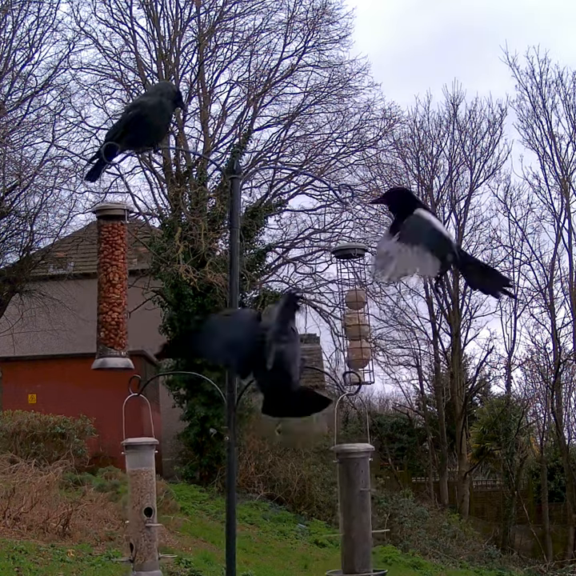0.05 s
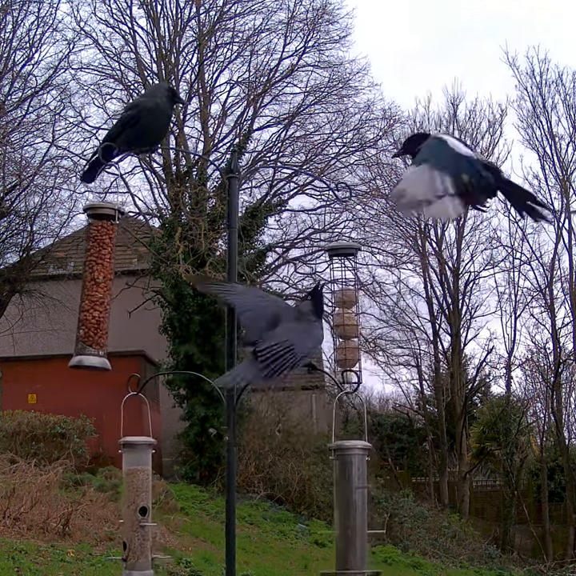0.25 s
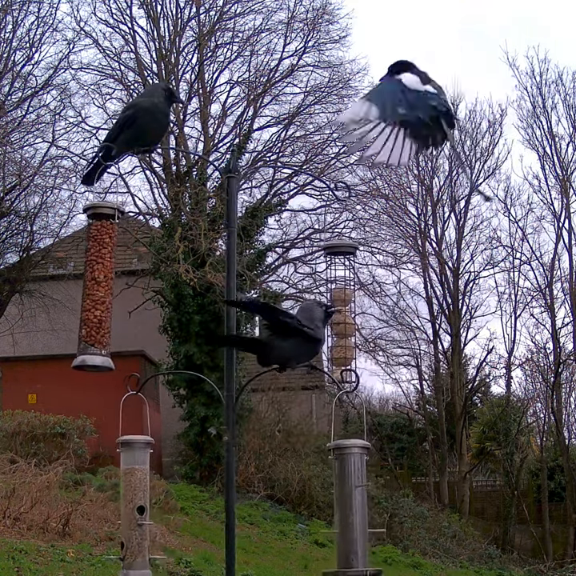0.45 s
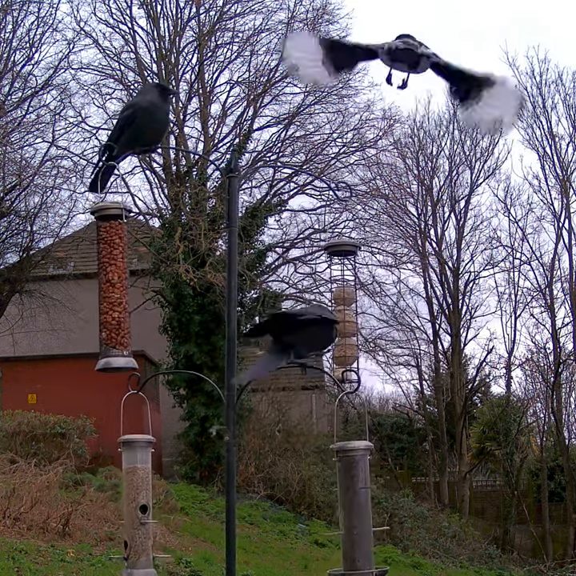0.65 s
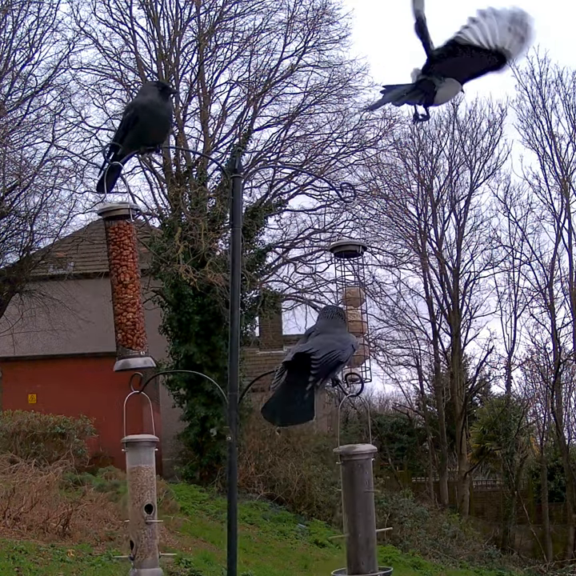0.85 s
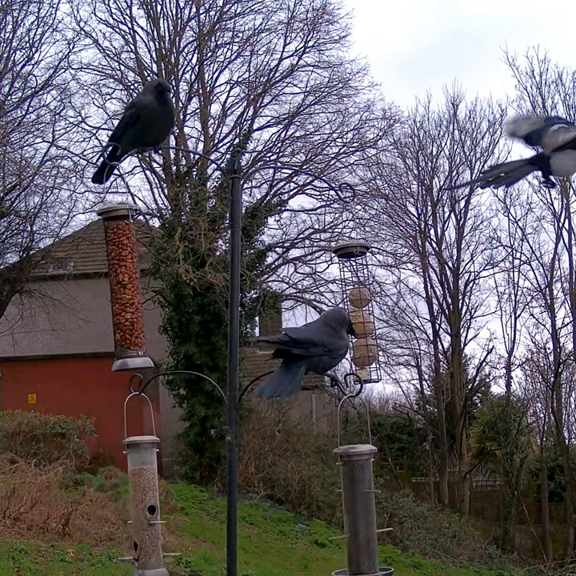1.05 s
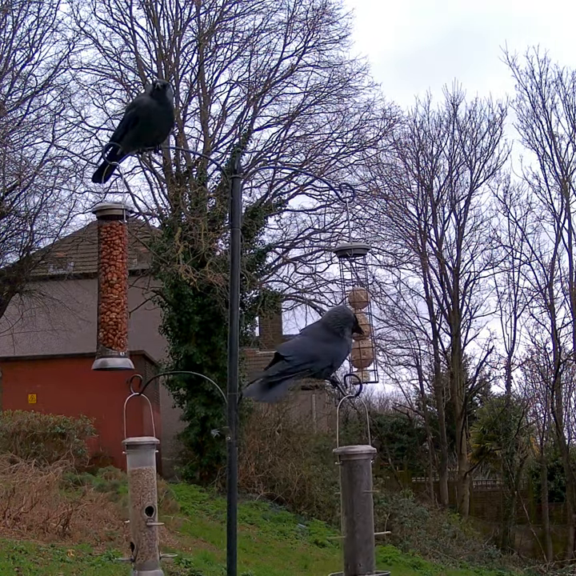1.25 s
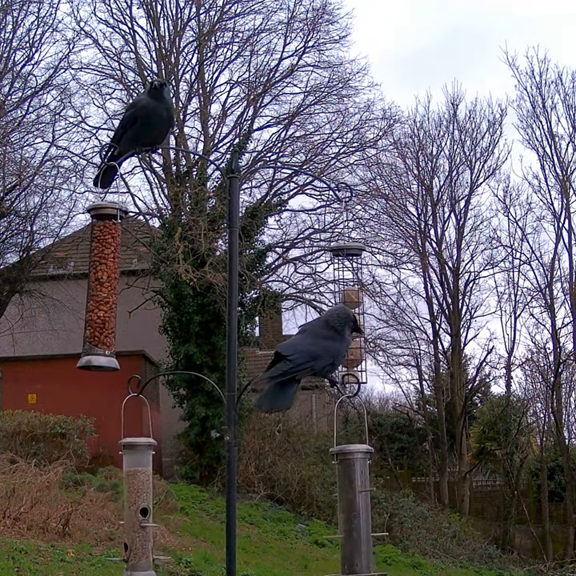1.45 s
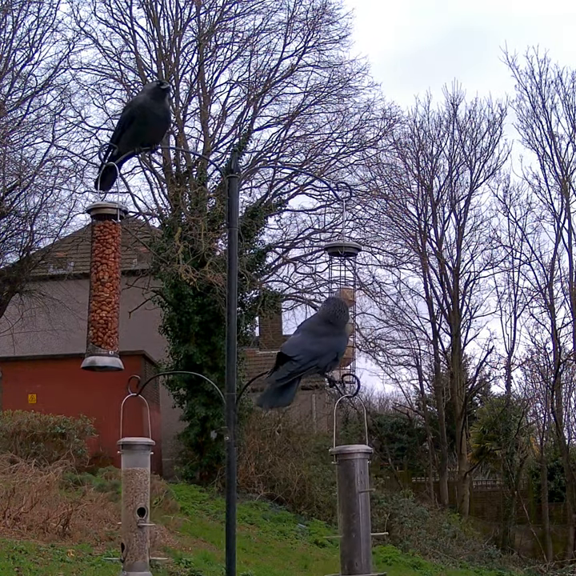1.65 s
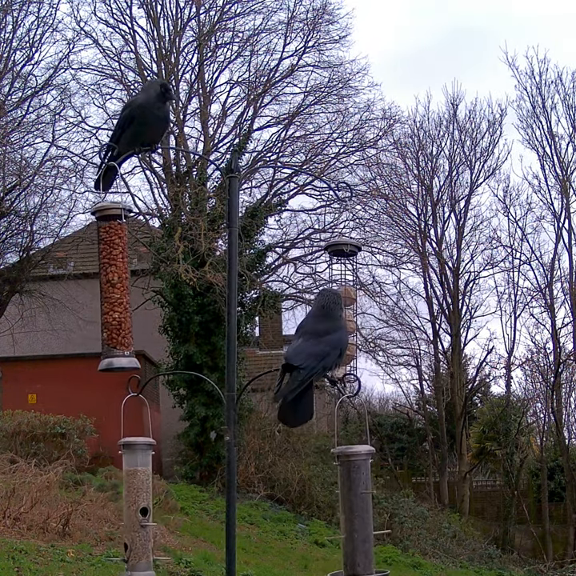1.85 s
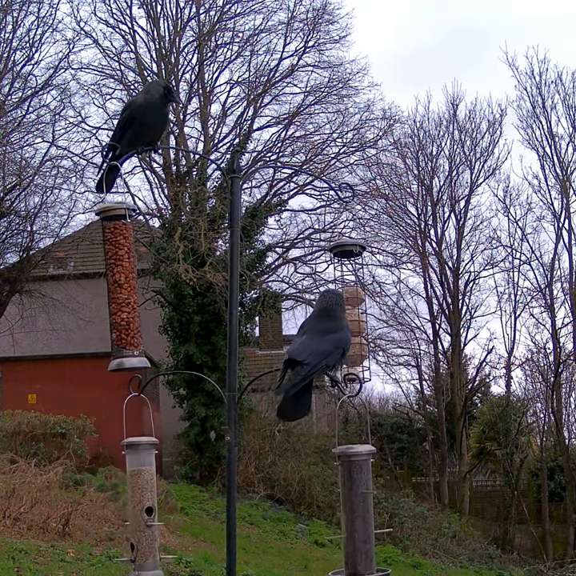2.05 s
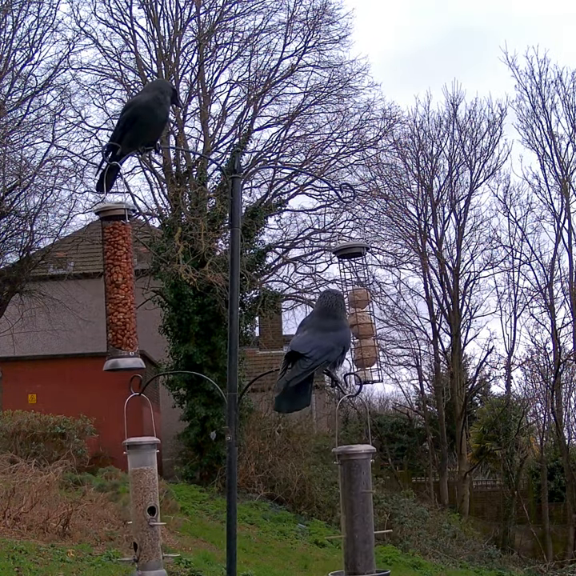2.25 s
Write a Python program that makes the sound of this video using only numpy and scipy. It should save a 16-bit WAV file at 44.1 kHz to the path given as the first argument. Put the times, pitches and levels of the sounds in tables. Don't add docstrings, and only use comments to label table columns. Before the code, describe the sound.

Two clipped, falling jackdaw calls half a second apart, the first fuller, echo briefly off garden walls; then soft wing flutters and small ticks fade over faint wind and traffic, heard through a small, slightly dull microphone.

```python
import sys
import numpy as np
from scipy import signal
from scipy.fft import rfft, irfft, next_fast_len
from scipy.io import wavfile
from scipy.ndimage import uniform_filter1d, map_coordinates

SR = 44100
rng = np.random.default_rng(int(sys.argv[2]) if len(sys.argv) > 2 else 0)


def gain_from_db(level_db):
    decades = np.asarray(level_db, float) / 20
    return 10 ** decades


def master_out(mix):
    frames = np.transpose(np.atleast_2d(mix))
    ceiling = np.clip(frames, -1, 1)
    pcm = np.round(ceiling * 32767).astype(np.int16)
    wavfile.write(sys.argv[1], SR, pcm)


N = 101429
T = np.arange(N) / SR


def unit(x):
    return x / np.sqrt(np.mean(x ** 2) + 1e-20)


def along(points, hz):
    f, value = np.transpose(points)
    return np.interp(np.log(hz + 1), np.log(f + 1), value)


def wobble(rate):
    knots = rng.standard_normal(int(N * rate / SR) + 4)
    return map_coordinates(knots, [T * rate])


def filtered(x, response):
    size = next_fast_len(N + SR // 2)
    return irfft(rfft(x, size) * response(np.fft.rfftfreq(size, 1 / SR)), size)[:N]


def peak(f, centre, width):
    return 1j * f * width / (centre * centre - f * f + 1j * f * width)


def sine(hz):
    return np.sin(2 * np.pi * np.cumsum(hz) / SR)


def rush(spectrum, patchy_db):
    cells = signal.stft(rng.standard_normal(N + 512), nperseg=512)[2]
    patches = uniform_filter1d(rng.standard_normal(cells.shape), size=6, axis=0)
    patches = unit(uniform_filter1d(patches, size=10, axis=1))
    noise = signal.istft(cells * gain_from_db(patchy_db * patches), nperseg=512)[1][:N]
    return unit(filtered(noise, lambda hz: gain_from_db(along(spectrum, hz))))


# pitch_hz, t60_s
GARDEN_DECAY = [(500, .24), (2000, 0.15), (8000, 0.13)]


def garden(x):
    hz, t, cells = signal.stft(rng.standard_normal(SR // 2), SR, nperseg=256)
    fade = gain_from_db(-60 * t / along(GARDEN_DECAY, hz)[:, None])
    tail = signal.istft(cells * fade, SR, nperseg=256)[1]
    return signal.fftconvolve(np.pad(x, (600, 0)), tail / np.linalg.norm(tail))[:N]


# time_s, level_db
WIND_GUSTS = [(0.0, -62), (0.1, -53.5), (0.14, -62.5), (0.3, -50), (0.33, -56.5), (0.73, -56.5),
              (0.77, -43), (0.81, -57), (1.14, -50.5), (1.29, -55), (1.32, -49.5), (1.44, -57.5),
              (2.04, -56.5), (2.05, -61.5), (2.14, -54.5), (2.3, -57.5)]
# pitch_hz, density_db
WIND_SPECTRUM = [(12, -31), (20, 5.5), (38, -4), (64, 0), (107, -9.5), (150, -28), (200, -17.5), (260, -34),
                 (440, -120)]


def wind():
    gust_db = np.interp(T, *np.transpose(WIND_GUSTS))
    rumble = gain_from_db(0.46 * wobble(30.2)) * rush(WIND_SPECTRUM, patchy_db=0.33)
    return gain_from_db(gust_db) * unit(rumble)


# time_s, level_db
AIR_STRENGTH = [(0.0, -65), (0.19, -62.5), (0.37, -58), (0.5, -64.5), (0.75, -59), (0.93, -57.5),
                (1.4, -61), (1.98, -65), (2.3, -64)]


def air_strength():
    return np.interp(T, *np.transpose(AIR_STRENGTH))


# pitch_hz, density_db
TRAFFIC_SPECTRUM = [(71, -30), (120, -11.5), (217, -5), (317, -8), (360, -5.5), (380, -14), (500, -9),
                    (962, -8.5), (1500, -33), (1950, -31), (3300, -120)]
TRAFFIC_DB = 1


def traffic(air_db):
    return gain_from_db(air_db + TRAFFIC_DB + 2.2 * wobble(7.925)) * rush(TRAFFIC_SPECTRUM, patchy_db=2.0)


# pitch_hz, density_db
HISS_SPECTRUM = [(760, -43), (1300, -9.5), (1740, -6), (1950, -9.5), (3240, -11.5), (3860, -10.5),
                 (5310, -11.5), (5900, -6), (8000, -13), (10400, -31), (17600, -120)]
HISS_DB, HISS_GROWS = -11, 1.13


def tree_hiss(air_db):
    mean_db = air_db.mean()
    level_db = mean_db + HISS_GROWS * (air_db - mean_db) + HISS_DB + 1.37 * wobble(13.06)
    return gain_from_db(level_db) * rush(HISS_SPECTRUM, patchy_db=-2.0)


def background():
    air_db = air_strength()
    return wind() + traffic(air_db) + tree_hiss(air_db)


# start_s, length_s, from_hz, to_hz, level_db
WHISTLES = [(0, .016, 1650, 1750, -68), (-.006, .011, 2550, 2500, -58), (.004, .018, 2000, 2750, -58),
            (.024, .014, 2100, 2500, -66), (.027, .015, 1700, 1700, -71), (.048, .01, 2200, 2600, -69),
            (.43, .03, 3250, 2750, -73), (.53, .07, 5000, 4920, -78), (1.39, .066, 8000, 7350, -69.5),
            (1.55, .045, 7500, 7150, -76), (1.59, .025, 6350, 5800, -80), (1.875, .03, 6350, 5800, -77)]


def whistle(start, length, from_hz, to_hz, db):
    progress = np.clip((T - start) / length, 0, 1)
    hz = from_hz + (to_hz - from_hz) * progress + 35 * wobble(150)
    swell = np.sqrt(2 * np.abs(np.sin(np.pi * progress))) * (progress < 1)
    return swell * gain_from_db(db + 3 * wobble(120)) * sine(hz)


# start_s, length_s, level_db, low_turn_s, swings_per_s
TRILLS = [
    (-.08, 0.11, -53, -.003, 48),
    (2.223, .1, -51, 2.246, 66),
]
TRILL_LOW_HZ, TRILL_CLIMB_HZ_PER_S, TRILL_TOP_HZ = 2180, 5100, 3780
TRILL_TOP_GAIN_HZ, TRILL_DWELL = 550, 2.1
TRILL_START_DB, TRILL_RISE_S = -12, 0.056
TRILL_TOP_DB, TRILL_TOP_LATE_S, TRILL_TURN_DB = -16, 0.06, 2.5
TRILL_ECHO_S, TRILL_ECHO_DB = 0.009, -11.5


def trill(start, length, db, turn, rate):
    age = np.clip(T - start, 0, length)
    young = np.clip(1 - age / TRILL_TOP_LATE_S, 0, 1)
    up = (np.abs(1 - np.cos(2 * np.pi * rate * (T - turn))) / 2) ** TRILL_DWELL
    low_hz = TRILL_LOW_HZ + TRILL_CLIMB_HZ_PER_S * np.minimum(age, 0.055)
    top_hz = TRILL_TOP_HZ - TRILL_TOP_GAIN_HZ * young
    hz = low_hz + (top_hz - low_hz) * up
    gate = np.clip(age / 0.004, 0, 1) * np.clip((length - age) / 0.006, 0, 1)
    level_db = db + TRILL_START_DB * np.clip(1 - age / TRILL_RISE_S, 0, 1)
    level_db = level_db - TRILL_TURN_DB * 4 * up * (1 - up) + TRILL_TOP_DB * up * np.sqrt(young)
    level_db = level_db + 2.0 * wobble(110)
    tone = np.sqrt(2) * gate * gain_from_db(level_db) * sine(hz)
    echo = filtered(tone, lambda f: np.exp(-2j * np.pi * f * TRILL_ECHO_S))
    tail_fade = gain_from_db(-300 * np.clip(T - start - length, 0, 1))
    return tone + gain_from_db(TRILL_ECHO_DB) * (echo + 0.99 * garden(tone) * tail_fade)


# time_s, peak_db, pitch_hz, length_s
TICKS = [(0.064, -65.5, 3840, 0.027), (0.091, -63.5, 3780, 0.025), (0.143, -57, 6070, 0.011),
         (0.17, -67, 3870, 0.0059), (0.325, -59.5, 6200, .003), (0.382, -61.5, 6050, .012),
         (.504, -46.5, 6100, 0.0068), (.509, -52, 7500, .005), (0.52, -54, 5950, .005),
         (0.57, -51, 3830, 0.0069), (0.58, -56, 3820, .006), (0.57, -54, 5930, 0.0092),
         (.579, -54, 2840, 0.00075), (0.798, -53, 3860, 0.0056), (.811, -54, 6150, 0.0055),
         (0.826, -58, 6000, 0.0043), (0.823, -54, 3760, 0.0069), (0.835, -55, 3800, .007),
         (0.867, -52.5, 3800, .009), (.881, -51.5, 3805, 0.0095), (.905, -52.5, 3900, .008),
         (.916, -53.5, 3800, 0.012), (0.943, -55, 6000, .006), (0.892, -46.5, 5820, 0.0033),
         (0.951, -52, 6740, 0.0054), (0.992, -53, 3920, 0.0034), (1.038, -50, 5950, 0.0078),
         (1.115, -60, 3700, 0.0054), (1.975, -64.5, 3820, 0.0063)]


def ticks():
    waver = np.cumsum(wobble(400)) * 45 / SR
    out = np.zeros(N)
    for s, db, hz, length in TICKS:
        bell = np.exp(-((T - s) / length * 2) ** 2)
        out += gain_from_db(db - 0.5) * bell * np.sin(2 * np.pi * (hz * T + waver))
    return out


# end_s, swell_s, level_db
STROKES = [(0.147, 0.013, -71), (0.387, 0.0068, -76), (.46, 0.022, -86), (0.508, 0.018, -58),
           (0.52, 0.013, -59.5), (.535, .025, -62.5), (.582, 0.06, -64), (.665, 0.047, -73.5),
           (0.817, 0.0099, -52), (0.846, 0.073, -56), (0.897, 0.014, -59), (0.948, 0.089, -56.5),
           (1.013, 0.012, -55.5), (1.047, 0.039, -55.5), (1.113, 0.017, -59), (1.148, 0.04, -57),
           (1.228, 0.046, -68), (1.257, 0.011, -60.5), (1.366, 0.025, -63), (1.48, 0.019, -67.5),
           (1.596, 0.018, -71), (1.72, 0.094, -73), (1.82, 0.011, -69), (1.886, 0.009, -78),
           (2.09, 0.013, -83.5)]
# pitch_hz, density_db
FEATHERS = [(760, -49.5), (1300, -27), (2020, -20), (2520, -6), (3290, -19.5), (3770, -4.5), (5310, -8),
            (5950, 4), (8000, -5.5), (10400, -26.5), (17600, -120)]
# pitch_hz, density_db
PUFF = [(60, -13.5), (250, -0.5), (750, 9), (1100, 0.5), (1500, -38)]
STROKE_STOP_S, RUSTLE_DB, PUFF_DB = 0.007, 1.8, 1


def wings():
    power = np.zeros(N)
    for end, swell, db in STROKES:
        distance = np.where(T < end, (end - T) / swell, (T - end) / STROKE_STOP_S)
        power += gain_from_db(2 * db) * np.exp(-2 * distance)
    rustle = unit(gain_from_db(RUSTLE_DB * wobble(250)) * rush(FEATHERS, patchy_db=1))
    puff = gain_from_db(PUFF_DB) * rush(PUFF + [(3000, -51)], patchy_db=2.5)
    return np.sqrt(power) * (rustle + puff)


# delay_s, level_db
ECHOES = [
    (0.031, -14.5),
    (.055, -24.5),
    (0.137, -34.5),
]
# pitch_hz, gain_db
WALL_COLOUR = [(900, 0.5), (2200, -5.5), (4000, -8.5), (7000, -2)]
WALL_SMEAR_S = 0.005


def wall_echoes(call):
    t, walls = T[:SR // 50], np.zeros(SR // 4)
    for delay, db in ECHOES:
        smear = rng.standard_normal(len(t)) * gain_from_db(-60 * t / WALL_SMEAR_S)
        walls[round(delay * SR):][:len(t)] += gain_from_db(db) * smear / np.linalg.norm(smear)
    echo = signal.fftconvolve(call, walls)[:N]
    return filtered(echo, lambda f: gain_from_db(along(WALL_COLOUR, f)))


# pitch_hz, width_hz, gain_db
THROAT = [(900, 670, 1.5), (2282, 290, 9), (1756, 380, -1.5), (2960, 650, 2.5), (3700, 540, 0),
          (4730, 340, -10.5), (6900, 670, -12)]


def throat(f):
    return sum(gain_from_db(g) * peak(f, centre, width) ** 2 for centre, width, g in THROAT)


# time_s, pitch_hz, effort_db
CALLS = [
    [(.222, 1130, -40), (.226, 1118, -32.5), (.236, 1060, -33), (.251, 922, -33), (.257, 845, -38),
     (.264, 770, -45), (.279, 640, -46)],
    [(.727, 1120, -56), (.733, 1090, -52), (.7355, 1040, -37.5), (.752, 925, -36), (.757, 870, -42),
     (.764, 780, -48), (.774, 700, -51)],
]
JITTER, BREATH_DB, ATTACK_S, RELEASE_S = 0.0041, -17, 0.00157, 0.0013
DULLING, ROUGH_DB = 0.55, 3
BREAKUP = 0.25
GARDEN_DB = -14


def jackdaw(rows):
    s, hz, db = np.transpose(rows)
    effort_db = np.interp(T, s, db)
    lost_db = effort_db - db.max()
    phase = 2 * np.pi * np.cumsum(np.interp(T, s, hz) * (1 + JITTER * wobble(300))) / SR
    fade = gain_from_db(DULLING * lost_db)
    voice = sum(fade ** k * np.cos((k + 1) * phase) for k in range(4))
    for k in range(5, 9):
        voice = voice + fade * gain_from_db(ROUGH_DB * wobble(900)) * np.cos(k * phase + 1.4 * wobble(700))
    breath = gain_from_db(BREATH_DB) * rng.standard_normal(N) * (1 + np.cos(phase)) * 3
    gate = np.clip((T - s[0]) / ATTACK_S, 0, 1) * np.clip((s[-1] - T) / RELEASE_S, 0, 1)
    effort = gain_from_db(effort_db + BREAKUP * lost_db * wobble(150))
    call = filtered((voice + breath) * gate * effort, throat)
    return call + wall_echoes(call) + gain_from_db(GARDEN_DB) * garden(call)


# pitch_hz, width_hz, lift_db
HOUSING = [(3530, 140, -4), (3796, 120, 9), (5950, 250, -1.5)]


def housing(f):
    return 1 + sum((gain_from_db(g) - 1) * peak(f, centre, width) for centre, width, g in HOUSING)


def scene():
    far_birds = sum(whistle(*row) for row in WHISTLES) + sum(trill(*row) for row in TRILLS)
    calls = sum(jackdaw(rows) for rows in CALLS)
    return (filtered(background() + wings(), housing) + far_birds + ticks() + calls)[None]


# pitch_hz, gain_db
IMAGE_FILTER = [(7600, -1), (8000, -4.5), (8500, -14.5), (8800, -28), (9050, -49)]
RATE_HZ = 16000


def low_rate(x):
    x = filtered(x, lambda f: f < RATE_HZ / 2)
    mirrored = x * (1 + 2 * np.cos(2 * np.pi * RATE_HZ * T))
    return filtered(mirrored, lambda f: gain_from_db(along(IMAGE_FILTER + [(9400, -120)], f)))


# from_s, to_s
GAPS = [
    (.187, .243),
    (.698, .756),
]
GAP_HZ, GAP_EDGE_S = 4750, 0.003


def treble_gaps(x):
    gap = sum(np.clip(np.minimum(T - a, b - T) / GAP_EDGE_S + 0.5, 0, 1) for a, b in GAPS)
    return x - gap * filtered(x, lambda f: np.clip((f - GAP_HZ) / 150 + 0.5, 0, 1))


def roll_off(x):
    return signal.sosfilt(signal.butter(12, 8930, fs=SR, output="sos"), x)


def record(dry):
    x = treble_gaps(low_rate(dry[0]))
    dither = filtered(rng.standard_normal(N), lambda f: np.where(f < 15700, 1, 0.6))
    x = x + gain_from_db(-93) * dither
    return roll_off(x[None])


dry = scene()
out = record(dry)
master_out(out)
```